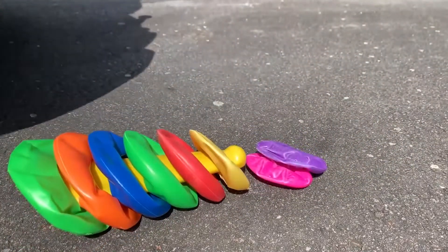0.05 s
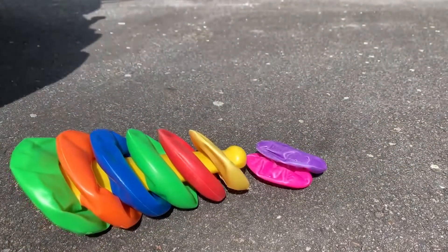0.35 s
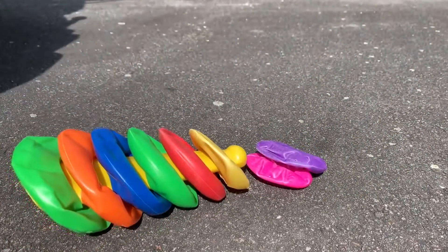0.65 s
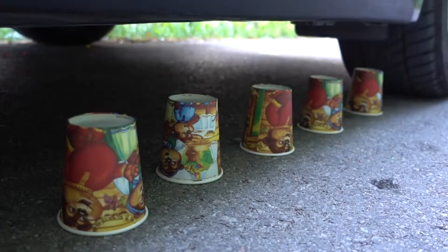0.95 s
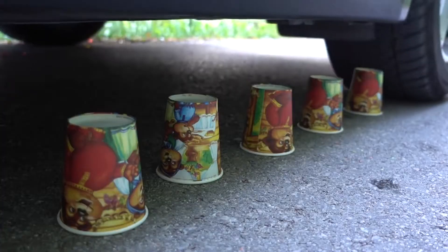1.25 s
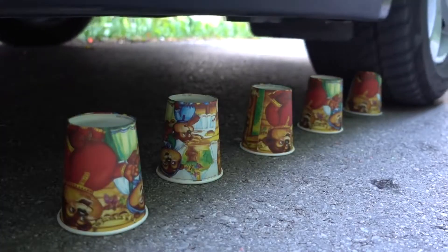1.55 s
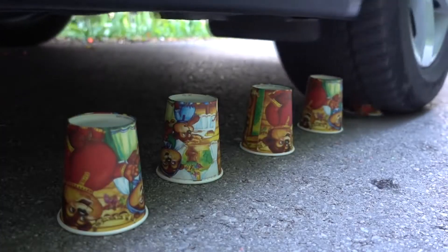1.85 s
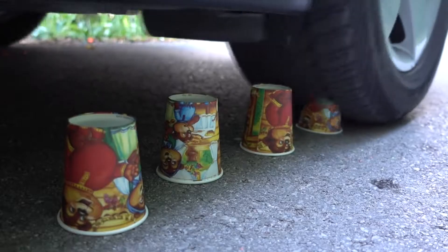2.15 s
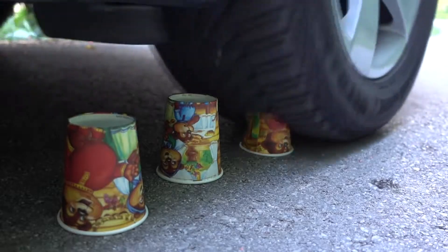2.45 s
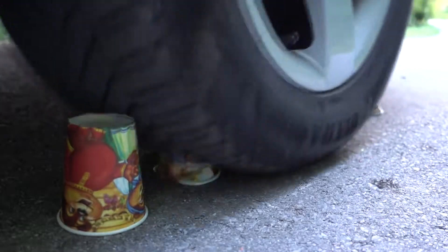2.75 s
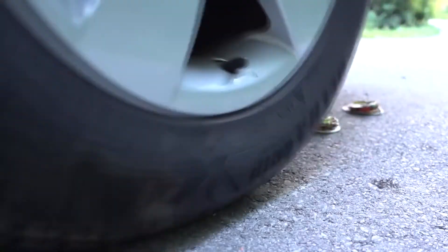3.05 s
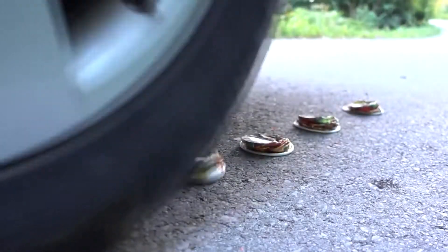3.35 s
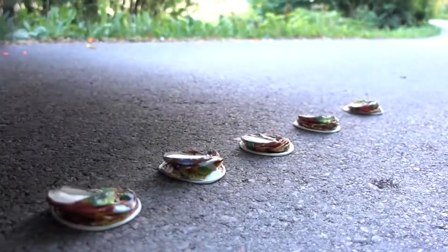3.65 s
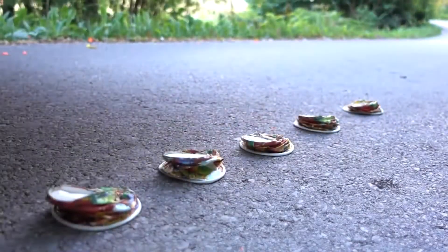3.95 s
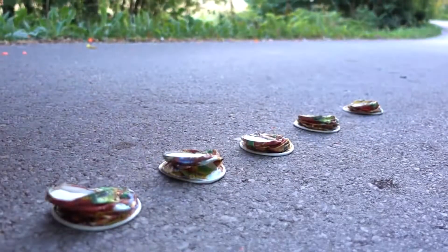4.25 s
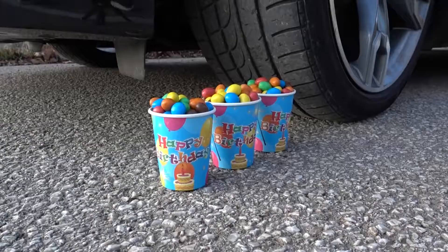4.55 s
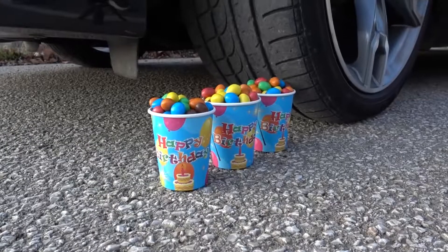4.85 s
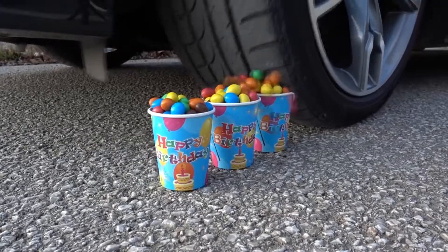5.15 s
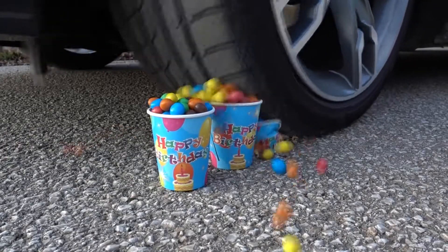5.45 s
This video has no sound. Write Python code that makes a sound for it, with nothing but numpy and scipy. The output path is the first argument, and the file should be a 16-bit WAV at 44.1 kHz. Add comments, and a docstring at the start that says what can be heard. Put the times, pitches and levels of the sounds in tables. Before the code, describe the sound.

A car engine hums for about a second and cuts off. Over faint outdoor background, a tyre rolls along asphalt near the microphone and crushes five paper cups in quick succession, each caving in with a pop and a crisp crumple. A few small ticks follow as it rolls away. Then a brake releases with a clunk and a squeak, and a cup of candy is crushed with bright cracking and rattling.

```python
"""On asphalt, close to a car: three scenes joined by hard cuts. The engine picks up and idles.
A coasting tyre flattens five upturned paper cups and rolls off left: bases cave in with a thump of air,
walls snap through, creases crackle. Last, a brake lets go with a squeak and a clunk, and a tyre
bursts a paper cup of hard-shelled candy: sugar shells split, loose sweets rattle."""
import sys
import numpy as np
from scipy import signal
from scipy.fft import rfft, irfft, next_fast_len
from scipy.io import wavfile
from scipy.ndimage import uniform_filter1d, map_coordinates

SR = 44100
rng = np.random.default_rng(int(sys.argv[2]) if len(sys.argv) > 2 else 0)


def to_wav(s):
    """Save 16-bit WAV."""
    ch = np.atleast_2d(s).T  # columns
    pcm = np.round(np.clip(ch, -1, 1) * 32767)  # PCM
    wavfile.write(sys.argv[1], SR, pcm.astype(np.int16))


N = 246959
TIME = np.arange(N) / SR

# engine, cups, candy: start/s, end/s
SCENE_SPANS = [(0, .936), (.967, 4.414), (4.447, 5.7)]

# firing rate: t/s, f/Hz
FIRING_RATE = [(0, 27.7), (.12, 29.5), (.2, 30.1), (.38, 32.3), (.46, 32.75), (.93, 32.9)]
# exhaust orders, labouring and idling: multiple of firing rate, level/dB
LABOUR_ORDERS = [(1, -1.5), (2, -13), (3, -4), (4, -10.5), (5, -5), (6, -18), (7, -18), (9, -10), (10, -18)]
IDLE_ORDERS = [(1, 0.5), (2, -8), (3, -28), (4, 2.5), (4.5, -15), (5, -10.5), (6, -15.5), (7, -4),
               (8, -7.5), (9, -24.5), (11, -14.5), (15, -19.5), (16, -23), (19, -22), (21, -27.5)]
IDLE_SHARE = [(.16, .05), (.38, 1)]  # t/s, share
WHINE_LEVEL = [(.3, -80), (.6, -69.5)]  # t/s, level/dB

# cup walls buckle or spring back, candy cup included: t/s, level/dB, f/Hz
WALL_POPS = [(1.022, -22.5, 1390), (1.329, -27.5, 1060), (1.5726, -3.5, 1560), (1.6426, -8.5, 1270),
             (1.7133, -11, 1180), (1.7564, -2, 1060), (1.7613, -2, 1340), (1.7931, -6.5, 910),
             (1.7999, -7.5, 890), (1.8485, -7, 1100), (1.896, -16.5, 1070), (1.9062, -14, 1070),
             (1.93, -16, 980), (1.9564, -10, 826), (2.0439, -8, 860), (2.0935, -2, 1800), (2.2557, -9, 850),
             (2.3813, -2, 1340), (2.4824, -5, 706), (2.578, -19, 1050), (2.6897, -9, 1030),
             (2.9154, -3.5, 740), (2.931, -4.5, 1150), (3.033, -4.5, 770), (3.3167, -11.5, 1953),
             (3.3231, -15, 1260), (3.4189, -10, 1440), (3.426, -17, 1150), (3.4546, -17, 1500),
             (3.471, -18.5, 1280), (3.5445, -6, 1394), (3.7612, -19.5, 1090), (3.9412, -20, 1050),
             (4.266, -26, 982), (5.129, -9, 1410), (5.189, -9, 1540), (5.279, -11, 620),
             (5.299, -13.5, 460), (5.329, -9.5, 670), (5.371, -13, 660), (5.542, -14, 1180)]
# stiff creases and grit snap: t/s, level/dB, f/Hz
CREASE_CRACKS = [(1.277, -38.5, 3500), (1.3279, -27.5, 2300), (1.3842, -20.5, 3000), (1.4902, -20.5, 2000),
                 (1.5227, -13, 2580), (1.5325, -10, 2900), (1.5437, -6.5, 2800), (1.5902, -8.5, 6300),
                 (1.6484, -9.5, 2490), (1.6776, -10.5, 1700), (1.7131, -6, 2090), (1.8258, -19, 2370),
                 (1.9564, -28, 5500), (2.0149, -9, 2600), (2.094, -14.5, 1720), (2.1225, -22, 4170),
                 (2.1585, -18.5, 6230), (2.2005, -9, 2110), (2.2223, -4.5, 2100), (2.2528, -18, 2980),
                 (2.2664, -9, 2800), (2.2775, -12.5, 7500), (2.3361, -6.5, 2890), (2.3432, -6, 2970),
                 (2.3564, -3.5, 1890), (2.4172, -4.5, 2400), (2.4261, -2.5, 2230), (2.4491, -6, 3500),
                 (2.4796, -13, 3330), (2.5048, -7.5, 3900), (2.5251, -14, 4570), (2.5515, -4, 3570),
                 (2.583, -9, 6500), (2.6085, -2, 2590), (2.629, -4.5, 3300), (2.647, -5.5, 2400),
                 (2.6962, -4.5, 3570), (2.7018, -9, 2820), (2.7585, -13, 2960), (2.8226, -6, 2050),
                 (2.826, -22, 7500), (2.839, -8, 3280), (2.8543, -1.5, 4350), (2.9166, -5.5, 2400),
                 (2.9502, -9.5, 1720), (2.9831, -2, 2000), (2.9952, -11.5, 4750), (3.0157, -5.5, 1680),
                 (3.0776, -22, 2830), (3.1608, -21, 5170), (3.329, -17, 2200), (3.378, -27.5, 2150),
                 (3.4046, -21, 4400), (3.4545, -14.5, 2200), (3.646, -26.5, 2226), (3.946, -26, 2000),
                 (4.266, -24, 1950), (4.362, -27.5, 2860)]
# rolling on asphalt: t/s, tread level/dB, rumble level/dB
ROLL_LEVELS = [(1.45, -42, -69), (1.6, -44.5, -48), (3.1, -47.5, -46), (3.35, -41.5, -51),
               (3.6, -43.5, -51), (3.85, -43.5, -49.5), (4.1, -47.5, -48.5), (4.3, -42.5, -44),
               (4.42, -43.5, -48.5)]
# tyre bumps over rims, drops off the last cup: t/s, level/dB, f/Hz, t60/s
RIM_BUMPS = [(1.585, -33.5, 253, 0.19), (1.715, -24, 250, 0.24), (2.765, -25.5, 145, 0.063),
             (3.064, -22.5, 118.3, 0.078)]
JOLT_DEPTH = [(3.03, 1), (3.12, .1)]  # unsteadiness of the tyre's air ring: t/s, share
# cup bases cave in: t/s, level/dB, f/Hz
BASE_PUFFS = [(1.4918, -10.5, 638), (1.992, -6, 626), (2.3216, -6.5, 726), (2.8074, -6, 700)]
# cups under the tread: t/s, length/s, creasing level/dB, weight level/dB
CUP_CRUSHES = [(1.517, 0.29, -30.5, -28), (2.006, 0.31, -29.5, -25.5), (2.344, 0.24, -25, -27),
               (2.607, .16, -23.5, -24), (2.806, 0.21, -24.5, -28)]
# stages of collapse: t/s, length/s, level/dB
CUP_SURGES = [(1.524, 0.065, -25.5), (1.644, 0.032, -31), (1.678, 0.019, -21.5), (1.755, 0.012, -24.5),
              (2.014, 0.024, -23), (2.093, 0.079, -21), (2.19, 0.062, -26.5), (2.357, 0.007, -22),
              (2.416, 0.048, -23.5), (2.442, 0.078, -23), (2.608, 0.034, -26), (2.687, 0.023, -20),
              (2.832, 0.074, -22.5), (2.912, 0.062, -30), (2.992, 0.035, -21.5)]
# crease treble, up as the tyre nears: t/s, level/dB
NEAR_TREBLE = [(1.5, -2.5), (2.5, 2), (3.1, -1)]
# tyre position: t/s, left minus right/dB
TYRE_PAN = [(1.0, -.5), (1.6, -1.8), (2.2, -1.2), (2.75, .5), (3.2, 1.6), (3.7, 3.8), (4.4, 4.8)]

# suspension takes up the load: t/s, level/dB, f/Hz, t60/s
SUSPENSION_THUDS = [(4.671, -26.5, 174, 0.022), (4.682, -25.5, 382, 0.0098), (4.69, -35.5, 122, 0.12),
                    (4.752, -43.5, 467, 0.094), (4.76, -33, 115.4, 0.14), (4.796, -34.5, 114.6, 0.26),
                    (4.818, -40.5, 236, 0.056), (4.848, -40, 206, 0.063)]
# slipping pad: t/s, f/Hz, level/dB
PAD_SQUEAK = [(4.68, 2010, -75), (4.705, 1965, -55), (4.74, 1930, -58), (4.748, 1850, -42.5),
              (4.766, 1670, -41.5), (4.776, 1850, -50), (4.79, 1810, -56), (4.81, 1810, -90)]
# pad resonances: f/Hz, width/Hz, level/dB
PAD_MODES = [(900, 250, 26), (1710, 250, 19), (3340, 1070, -2)]
PAD_RUB = [(4.78, .26, -60.5)]  # t/s, length/s, level/dB
CREEP_LEVEL = [(4.64, -59), (4.7, -45), (4.84, -46.5), (4.92, -49), (5.2, -60)]  # t/s, level/dB

# candy cracking, and tyre weight on its cup: t/s, level/dB
CANDY_CRACKING = [(4.98, -50), (5.045, -49), (5.13, -29.5), (5.33, -30), (5.5, -24.5), (5.6, -37)]
CANDY_LOAD = [(5.05, -57), (5.15, -52), (5.33, -45), (5.6, -38)]
# sweets burst together: t/s, length/s, level/dB
CANDY_SURGES = [(5.122, 0.034, -26.5), (5.177, 0.076, -26.5), (5.266, 0.016, -24), (5.364, 0.016, -22),
                (5.416, 0.017, -26.5), (5.46, 0.077, -23), (5.54, 0.057, -25)]
# single shells split, hit the road: t/s, level/dB, f/Hz
SHELL_CRACKS = [(4.999, -38, 3474), (5.0243, -33, 7000), (5.0517, -29, 8320), (5.0634, -18, 5000),
                (5.0911, -23, 6650), (5.1168, -19.5, 4420), (5.1345, -17.5, 4300), (5.1902, -6, 2630),
                (5.2066, -7, 4870), (5.2358, -8, 4010), (5.272, -8.5, 5000), (5.285, -11, 5940),
                (5.3044, -9, 4600), (5.349, -6.5, 7500), (5.3664, -6.5, 6920), (5.412, -11.5, 4740),
                (5.4207, -10, 2760), (5.4695, -10, 3360), (5.5252, -8, 8050), (5.5389, -8.5, 5030),
                (5.5574, -7.5, 4310), (5.5667, -5.5, 7000), (5.573, -5.5, 8800), (5.5872, -10.5, 7110)]

# noise spectra (yard, lane: outdoor backgrounds): f/Hz, density level/dB
ENGINE_SPECTRUM = [(25, 0.5), (130, -5), (260, -8.5), (420, -19), (650, -24.5), (1000, -30.5),
                   (1250, -39.5), (1900, -38.5), (2700, -41.5), (5000, -45.5), (7300, -50.5), (8500, -46),
                   (11000, -58), (13500, -50.5), (15000, -54), (15800, -68)]
YARD_SPECTRUM = [(15, -48.5), (25, -3.5), (134, -3), (444, -7.5), (588, -4.5), (884, -16.5), (1590, -12),
                 (1900, -16), (2330, -12.5), (4070, -23), (6780, -23), (11000, -30.5), (14300, -58),
                 (22000, -120)]
PAPER_SPECTRUM = [(530, -35), (900, 5.5), (1300, -1.5), (1490, -8.5), (2120, -4), (2670, -7.5), (3440, -8),
                  (5690, -14), (7390, -13), (10500, -18), (11000, -24), (14300, -64.5), (22000, -120)]
TREAD_SPECTRUM = [(210, -46.5), (350, -5), (422, -10), (606, -1), (741, -3.5), (1190, -3.5), (1460, -2.5),
                  (1870, -3), (3890, -14), (5050, -19.5), (11000, -25.5), (14300, -68.5), (22000, -120)]
RUMBLE_SPECTRUM = [(20, -24), (86, -2.5), (231, -4.5), (333, -12.5), (450, -15), (800, -47)]
LANE_SPECTRUM = [(15, -46), (25, -15), (130, -8.5), (342, -14), (414, -3), (604, -20.5), (812, -16),
                 (1250, -22.5), (15800, -40.5)]
CREEP_SPECTRUM = [(40, -8), (119, 2.5), (200, -6), (347, -6), (800, -19.5), (1120, -32), (1400, -24.5),
                  (6000, -55), (12000, -80)]
SUGAR_SPECTRUM = [(530, -26), (900, 6), (1140, -7.5), (1340, -4.5), (1960, -6), (3450, -10), (3700, -9),
                  (4230, -6.5), (7510, -2), (11000, -9), (15800, -19)]
# stereo width, close and all-round sound: f/Hz, side minus mid/dB
CLOSE_WIDTH = [(60, -18), (300, -18), (1300, -13.5), (4400, -8.5), (10000, -7)]
DIFFUSE_WIDTH = [(60, -20), (300, -13), (1000, 0)]
# echo between road and car body: f/Hz, t60/s
UNDERBODY_DECAY = [(200, 0.088), (2000, 0.19), (10000, 0.0097)]

SURGE_ATTACK_S, SURGE_T60_S = .00073, .11


def amp(db):
    """dB to gain."""
    return 10 ** (np.asarray(db) / 20)


def unit(x):
    """Scale to rms 1."""
    return x / np.sqrt(np.mean(x ** 2) + 1e-20)


def along(points, hz):
    """Read (f/Hz, value) points on a log axis."""
    f, v = np.transpose(points)
    return np.interp(np.log(hz + 1), np.log(f + 1), v)


def curves(rows):
    """Per-sample curve for each column after t/s."""
    s, *cols = np.transpose(rows)
    return [np.interp(TIME, s, c) for c in cols]


def wobble(rate_hz):
    """Smooth random curve through knots at rate_hz."""
    return map_coordinates(rng.standard_normal(int(N * rate_hz / SR) + 4), [TIME * rate_hz])


def during(start_s, end_s):
    """Gate with 2 ms edges."""
    return np.clip(np.minimum(TIME - start_s, end_s - TIME) / .002, 0, 1)


def filtered(x, response):
    """Apply a frequency response."""
    size = next_fast_len(N + SR // 4)
    return irfft(rfft(x, size) * response(np.fft.rfftfreq(size, 1 / SR)), size)[..., :N]


def band(x, lo_hz, hi_hz):
    """Causal band-pass."""
    sos = signal.butter(3, [lo_hz, min(hi_hz, SR / 2 - 1)], "band", fs=SR, output="sos")
    return signal.sosfilt(sos, x)


def rush(spectrum, wide_db=0, width=CLOSE_WIDTH):
    """Coloured stereo noise, rms 1, narrow in the bass."""
    def response(hz):
        return amp(along(spectrum, hz)) * [np.ones_like(hz), amp(along(width, hz) + wide_db)]
    mid, side = filtered(rng.standard_normal((2, N)), response)
    return unit(np.array([mid + side, mid - side]))


def steady(x, window_s=.057):
    """Hold running rms near 1; single grains still stand out."""
    power = np.mean(unit(x) ** 2, axis=0)
    size = max(int(window_s * SR), 8)
    running = uniform_filter1d(uniform_filter1d(power, size), size // 2)
    return unit(x) / np.sqrt(np.abs(running) + .0075)


def swells(rows, attack_s, t60_s):
    """Joint rise-hold-decay gain. Rows: t/s, length/s, level/dB."""
    power = np.zeros(N)
    for s, length_s, db in rows:
        first = int(s * SR)
        t = TIME[first:] - s
        attack = np.clip(t / attack_s, 0, 1)
        power[first:] += (attack * amp(db - 60 * np.maximum(t - length_s, 0) / t60_s)) ** 2
    return np.sqrt(power)


def bursts(times_s, gains, t60_s, tail_db, tail_t60_s):
    """Fracture envelope: instant onset, fast decay, faint tail."""
    t = np.arange(SR // 8) / SR
    hits = np.bincount(np.clip(times_s * SR, 0, N - 1).astype(int), gains ** 2, N)
    power = amp(-60 * t / t60_s) ** 2 + amp(tail_db - 60 * t / tail_t60_s) ** 2
    return np.sqrt(np.abs(signal.fftconvolve(hits, power)[:N]))


def rings(times_s, gains, hz, t60_s, samples, swell_cycles=.42, rise=0):
    """Damped sines with soft onsets; pitch climbs by the share `rise` per t60."""
    t = np.arange(samples) / SR
    cycles = hz[:, None] * t * (1 + rise * t / t60_s[:, None] / 2)
    swell = 1 - np.exp(-(cycles / swell_cycles) ** 2)
    waves = gains[:, None] * np.sin(2 * np.pi * cycles) * amp(-60 * t / t60_s[:, None]) * swell
    index = (times_s * SR).astype(int)[:, None] + np.arange(samples)
    return np.bincount(index.ravel(), waves.ravel(), N)[:N]


def engine():
    """Exhaust pulses change colour as revs settle; hiss swells per firing; a faint whine enters."""
    whine_hz, right_delay_s = 6019, .00043  # engine stands to the left
    firings = np.cumsum(curves(FIRING_RATE)[0]) / SR - .74
    settled, = curves(IDLE_SHARE)
    exhaust = np.zeros(N)
    for orders, share in (LABOUR_ORDERS, 1 - settled), (IDLE_ORDERS, settled):
        tones = np.zeros(N)
        for k, db in orders:
            phase = 2 * np.pi * k * firings - .075 * k ** 2  # pipe delays the higher orders
            tones += amp(db + .7 * wobble(14)) * np.cos(phase + .05 * wobble(12))
        exhaust += amp(-23.5) * share * unit(tones)
    whine_phase = 2 * np.pi * whine_hz * TIME + .5 * wobble(30.5)
    whine = amp(curves(WHINE_LEVEL)[0]) * (np.sin(whine_phase) + amp(-8) * np.sin(2 * whine_phase))
    hiss = unit(band(rush(ENGINE_SPECTRUM, width=DIFFUSE_WIDTH), 26, 20000))
    left, right = exhaust + hiss * amp(-31.5 + np.cos(2 * np.pi * firings))
    return np.array([left, np.pad(right, (int(right_delay_s * SR), 0))[:N]]) + whine


def relaxing(pops_per_cup):
    """Flattened cups relax with faint random pops. Rows: t/s, level/dB, f/Hz."""
    s, length_s, db, _ = np.repeat(CUP_CRUSHES, pops_per_cup, axis=0).T
    when, strength, pitch = rng.uniform(-.27, 1, (len(s), 3)).T
    delay_s = .42 * (1 + when)
    return np.transpose([s + length_s + delay_s, db - 3 + 3 * strength, 1400 * np.exp(.35 * pitch)])


def wall_pops():
    """A wall snaps through: panel note, overtone, air push, hollow ring rising as the cup shrinks."""
    s, db, hz = np.vstack([WALL_POPS, relaxing(pops_per_cup=6)]).T
    detune = np.exp(.13 * rng.standard_normal((len(s), 2))).T
    note = rings(s - .0005, amp(db + 12), hz, 5 / hz, samples=1500, swell_cycles=1.15)
    overtone = rings(s, amp(db - 9.5), hz * 1.7 * detune[0], 5 / hz, samples=1000)
    push = rings(s + .002, amp(db - 8), hz * .66, 5 / hz, samples=1500)
    hollow = rings(s + .00315, amp(db - 18), hz * detune[1], 32 / hz, samples=3000, rise=.14)
    snap = rush(PAPER_SPECTRUM) * bursts(s, amp(db - 23), t60_s=.005, tail_db=-10, tail_t60_s=.04)
    return note + overtone + push + hollow + snap


def fractures(rows, q, edge_db, t60_s, tail_t60_s):
    """Each break and its brief rustle ring one resonance behind a sharp edge."""
    out, t = np.zeros((2, N + SR)), np.arange(SR // 16) / SR
    envelope = amp(-60 * t / t60_s) + amp(-16 - 60 * t / tail_t60_s)
    for s, db, hz in rows:
        mid, side = rng.standard_normal((2, len(t))) * envelope
        mid[0] += 4  # the break
        click = signal.lfilter(*signal.iirpeak(hz, q, SR), [mid + side / 2, mid - side / 2])
        click += amp(edge_db - 60 * t / .006) * np.diff(mid, prepend=0)
        out[:, int(s * SR):][:, :len(t)] += amp(db) * click / np.abs(click).max()
    return out[:, :N]


def cup_load(t60_s):
    """Tyre weight bears on each cup from just before to just after its creasing."""
    lead_s, overhang_s = .041, .0081
    rows = [(s - lead_s, lead_s + length_s + overhang_s, db) for s, length_s, _, db in CUP_CRUSHES]
    return swells(rows, attack_s=.13, t60_s=t60_s)


def facets(x, depth_db):
    """Facets ring at pitches that shift every few hundredths of a second."""
    spectra = signal.stft(x, nperseg=512)[2]

    def patches(bins):
        noise = rng.standard_normal(spectra.shape[1:])
        return unit(uniform_filter1d(uniform_filter1d(noise, bins, 0), 4, 1))
    field = np.clip(.75 * patches(bins=2) + .65 * patches(bins=9), -2, 2)
    return signal.istft(spectra * amp(depth_db * field), nperseg=512)[1][:, :N]


def thuds(rows):
    """Low damped knocks."""
    s, db, hz, t60_s = np.transpose(rows)
    return rings(s - .002, amp(db + 8.5), hz, t60_s, samples=8000)


def tyre(weight):
    """Tread hisses over grit; the air ring inside is jolted by the cups, then hums freely."""
    cavity_hz = 227.5
    tread_db, rumble_db = curves(ROLL_LEVELS)
    tread = unit(facets(rush(TREAD_SPECTRUM, wide_db=2.5), depth_db=3))
    tread *= amp(tread_db + wobble(25) + 1.8 * wobble(300))
    jolt, = curves(JOLT_DEPTH)
    phase = 2 * np.pi * cavity_hz * TIME + 1.6 * jolt * wobble(32)
    ringing = np.hypot(amp(-1.5) * weight, amp(-5.5) * cup_load(t60_s=2.13))
    hum = ringing * amp(jolt * (3.5 * wobble(22) - 3)) * np.sin(phase)
    rumble = np.hypot(amp(rumble_db), amp(-9.5) * weight) * rush(RUMBLE_SPECTRUM)
    return (tread + rumble + hum + thuds(RIM_BUMPS)) * during(1.49, 4.5)


def base_puffs():
    """A base caves in at first touch: round thump of the air inside, lower push, two rebounds."""
    rebound_s, rebound_loss_db, half_length_cycles = .00569, 9, .81
    out = np.zeros(N)
    for s, db, hz in BASE_PUFFS:
        for k in range(3):
            cycles = (TIME - s - k * rebound_s) * hz
            near = np.abs(cycles) < 10
            c = cycles[near]
            thump = np.cos(2 * np.pi * c) * np.exp(-(c / half_length_cycles) ** 2)
            push = np.sin(np.pi * c) * np.exp(-((c - 1) / 2) ** 2)
            out[near] -= amp(db - k * rebound_loss_db) * (thump + amp(-18) * push)
    return out


def crackle(spectrum, pressure, treble_db, scatter_db, facet_db, count):
    """Clumped swarm of tiny fractures, louder with pressure."""
    when, strength = rng.random((count, 2)).T
    gains = amp(-scatter_db * np.log(strength + .015))
    snaps = bursts(when * N / SR, gains, t60_s=.0045, tail_db=-15, tail_t60_s=.025)
    grains = facets(rush(spectrum), facet_db) * snaps * amp(wobble(90))
    body = steady(band(grains, 1400, 4500), window_s=.03)
    edge = steady(band(grains, 4500, 16000), window_s=.03)
    return pressure * (body + amp(treble_db) * edge)


def ring_swarm(lo_hz, hi_hz, cycles, scatter_db, slope, count, samples):
    """Random folds or knocks, each at its own pitch, 60 dB down after `cycles`."""
    when, pitch, strength, sign = rng.random((count, 4)).T
    hz = lo_hz * (hi_hz / lo_hz) ** pitch
    gains = amp(-scatter_db * np.log(strength + .075)) * hz ** slope * np.sign(sign - .5)
    swarm = rings(when * N / SR, gains, hz, cycles / hz, samples)
    return steady(band(swarm, lo_hz * .8, hi_hz * 1.15)[None])


def cups(weight):
    """Cups crease, rustle and fold in surges under the tread, thumping on the road."""
    crushes = np.array(CUP_CRUSHES)[:, :3]
    surges = swells(CUP_SURGES, SURGE_ATTACK_S, SURGE_T60_S)
    creasing = swells(crushes, attack_s=.0047, t60_s=.13)
    rustling = amp(-8.5) * swells(crushes, attack_s=.0047, t60_s=.75)
    pressure = np.hypot(np.hypot(creasing, rustling), surges)
    treble_db = curves(NEAR_TREBLE)[0] - 5.5
    creases = crackle(PAPER_SPECTRUM, pressure, treble_db, scatter_db=3.4, facet_db=4.6, count=8000)
    folding = np.hypot(amp(-3) * swells(crushes, attack_s=.034, t60_s=.45), amp(-3.5) * surges)
    folds = ring_swarm(374, 1346, cycles=17, scatter_db=-3, slope=.35, count=1900, samples=2000)
    thumps = ring_swarm(108, 320, cycles=9, scatter_db=2.5, slope=1.1, count=900, samples=3600)
    return amp(-2.6) * creases + folding * folds + amp(-5.5) * weight * thumps


def brake():
    """Pads slip with a falling squeak and rub on; the suspension thuds; the car creeps."""
    def pad_response(f):
        return sum(amp(db) * 1j * f * width_hz / (hz * hz - f * f + 1j * f * width_hz)
                   for hz, width_hz, db in PAD_MODES)
    squeak_hz, squeak_db = curves(PAD_SQUEAK)
    flutter = amp(2.5 * wobble(300))
    squeak = flutter * np.sin(2 * np.pi * np.cumsum(squeak_hz + 55 * wobble(500)) / SR)
    scrape = unit(band(filtered(rng.standard_normal(N), pad_response), 450, 7500))
    slip = amp(squeak_db) * (squeak + .65 * scrape)
    creep = amp(curves(CREEP_LEVEL)[0]) * rush(CREEP_SPECTRUM)
    rub = swells(PAD_RUB, attack_s=.027, t60_s=.3) * unit(band(rng.standard_normal(N), 1055, 1185))
    return thuds(SUSPENSION_THUDS) + slip + creep + rub


def candy():
    """Sugar shells shatter, loose sweets rattle; the cup folds, thumps and drums on the tyre."""
    surges = swells(CANDY_SURGES, SURGE_ATTACK_S, SURGE_T60_S)
    cracking = np.hypot(amp(curves(CANDY_CRACKING)[0]), surges)
    weight = amp(curves(CANDY_LOAD)[0])
    folding = np.hypot(amp(-8) * cracking, amp(9.5) * weight)
    shatter = crackle(SUGAR_SPECTRUM, cracking, treble_db=1.5, scatter_db=2.8, facet_db=4, count=11000)
    rattle = ring_swarm(2600, 10000, cycles=40, scatter_db=3, slope=0, count=3000, samples=700)
    folds = ring_swarm(315, 1500, cycles=15.5, scatter_db=4.5, slope=.81, count=3200, samples=1400)
    thumps = ring_swarm(78, 150, cycles=7, scatter_db=0, slope=.8, count=500, samples=3500)
    drum = ring_swarm(190, 240, cycles=14, scatter_db=1, slope=0, count=500, samples=3000)
    shells = fractures(SHELL_CRACKS, q=1.6, edge_db=-21, t60_s=.012, tail_t60_s=.03)
    sweets = amp(-2) * shatter + amp(-4) * cracking * rattle
    cup = folding * folds + weight * (amp(-2) * thumps + amp(1.5) * drum)
    return (sweets + cup) * during(4.996, 5.7) + shells


def underbody(x, wet_db):
    """Add the short diffuse echo under the car."""
    hz, t, spectra = signal.stft(rng.standard_normal((3, SR // 5)), SR, nperseg=256)
    decay = amp(-60 * t / along(UNDERBODY_DECAY, hz)[:, None])
    left, right, shared = signal.istft(spectra * decay, SR, nperseg=256)[1]
    tail = np.pad([left + shared, right + shared], ((0, 0), (SR // 400, 0)))
    return x + amp(wet_db) * signal.fftconvolve(x, tail / np.linalg.norm(tail[0]), axes=1)[:, :N]


def panned(x, lead_samples_per_db, shade_hz):
    """The side nearer the tyre leads and, above shade_hz, is louder."""
    pan_db, = curves(TYRE_PAN)
    sides = np.array([[.5], [-.5]])
    highs = filtered(x, lambda hz: hz ** 2 / (hz ** 2 + shade_hz ** 2))
    shaded = x + (amp(sides * pan_db) - 1) * highs
    positions = np.arange(N) + sides * lead_samples_per_db * pan_db
    return np.array([map_coordinates(channel, [at]) for channel, at in zip(shaded, positions)])


def scene():
    """Engine, cups, candy in turn; the last two over wide outdoor backgrounds."""
    weight, pops = cup_load(t60_s=.51), wall_pops()
    paper = cups(weight) + pops + base_puffs()
    paper += fractures(CREASE_CRACKS, q=2.2, edge_db=-20, t60_s=.013, tail_t60_s=.05)
    rolling = underbody(paper, wet_db=-15) + tyre(weight)
    cup_scene = panned(rolling, lead_samples_per_db=.65, shade_hz=240)
    cup_scene += amp(-54) * rush(YARD_SPECTRUM, wide_db=6)
    candy_scene = brake() + underbody(candy() + pops, wet_db=-11.5)
    candy_scene += amp(-57) * rush(LANE_SPECTRUM, wide_db=6)
    scenes = engine(), cup_scene, candy_scene
    return sum(sound * during(*span) for sound, span in zip(scenes, SCENE_SPANS))


def record(dry):
    """Soft peak limit, then low-pass; narrower band in the cup scene."""
    ceiling, cups_top_hz, top_hz = .68, 11150, 15950
    rounded = dry / (1 + np.abs(dry / ceiling) ** 6) ** (1 / 6)
    narrowed = rounded - during(*SCENE_SPANS[1]) * filtered(rounded, lambda hz: hz > cups_top_hz)
    return filtered(narrowed, lambda hz: hz < top_hz)


dry = scene()
out = record(dry)
to_wav(out)
```